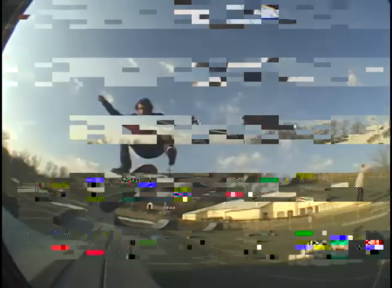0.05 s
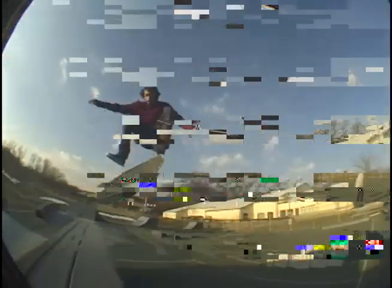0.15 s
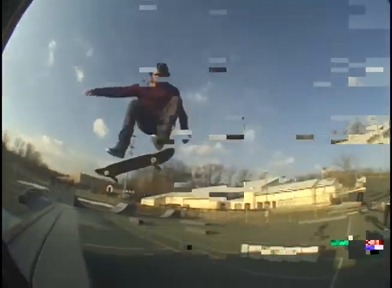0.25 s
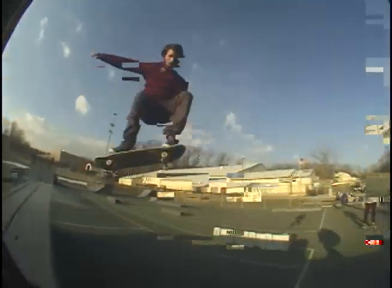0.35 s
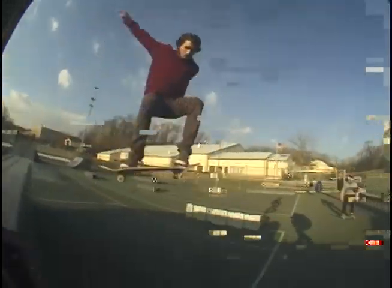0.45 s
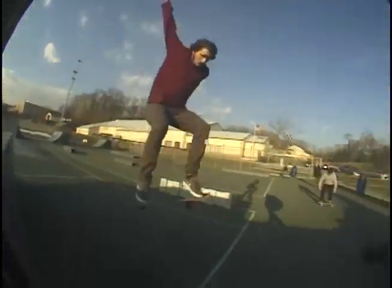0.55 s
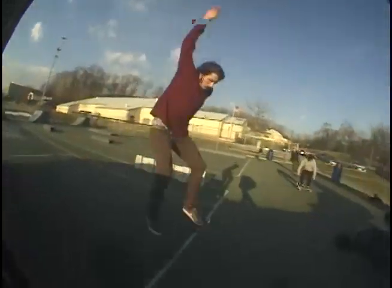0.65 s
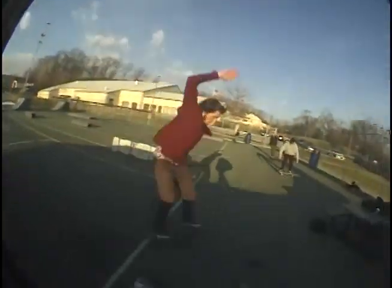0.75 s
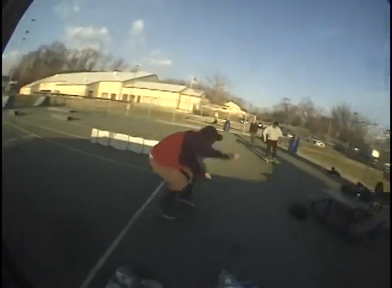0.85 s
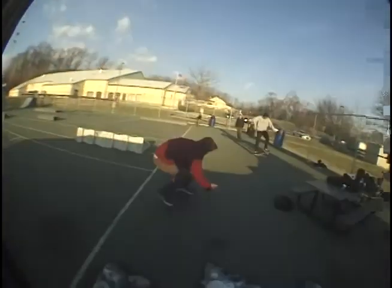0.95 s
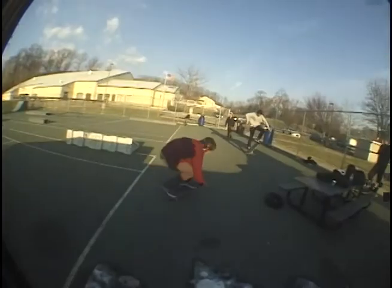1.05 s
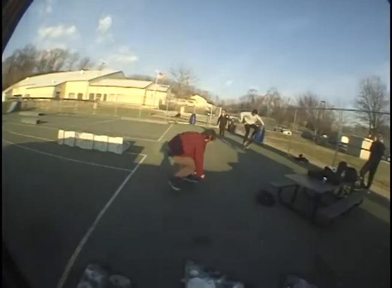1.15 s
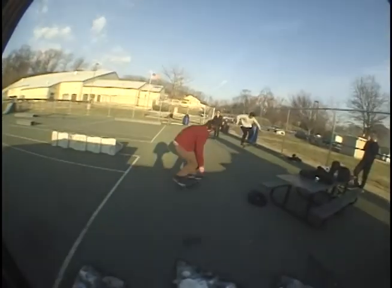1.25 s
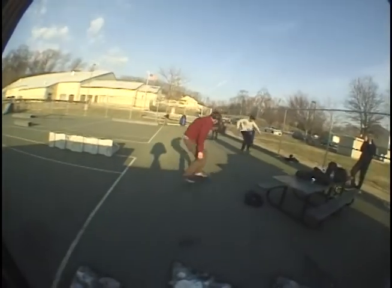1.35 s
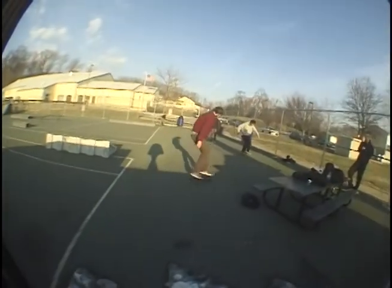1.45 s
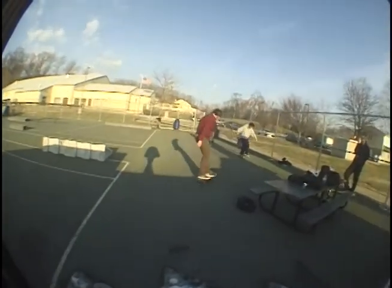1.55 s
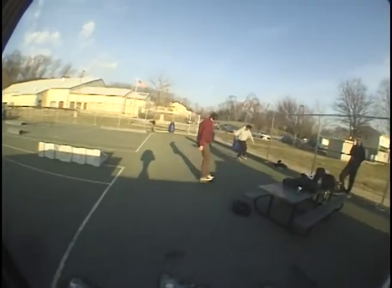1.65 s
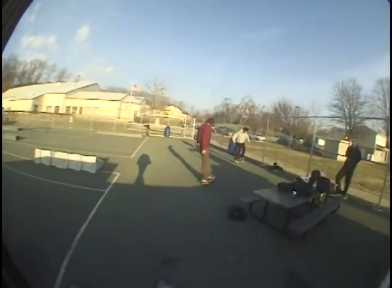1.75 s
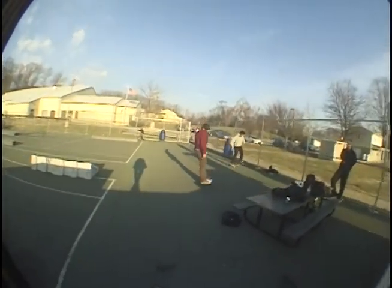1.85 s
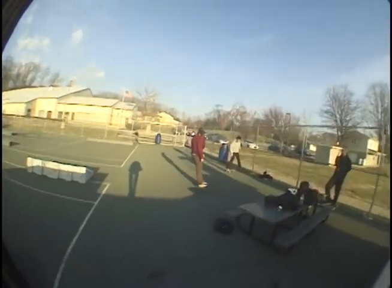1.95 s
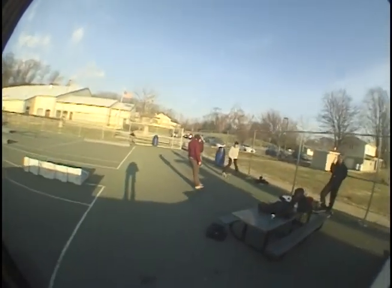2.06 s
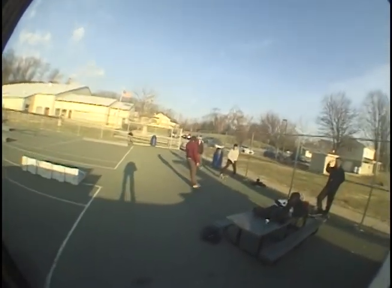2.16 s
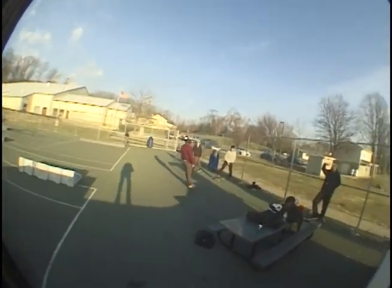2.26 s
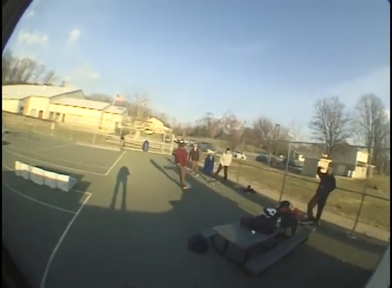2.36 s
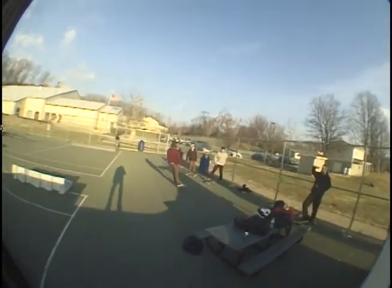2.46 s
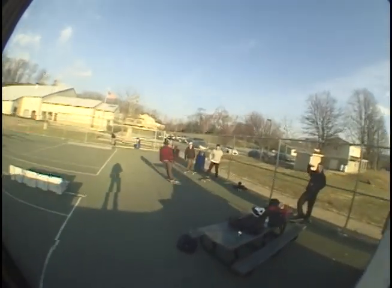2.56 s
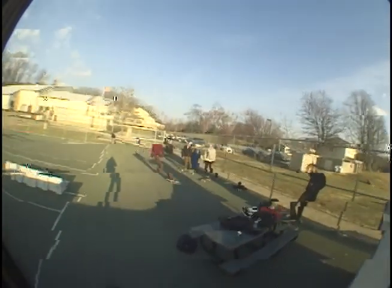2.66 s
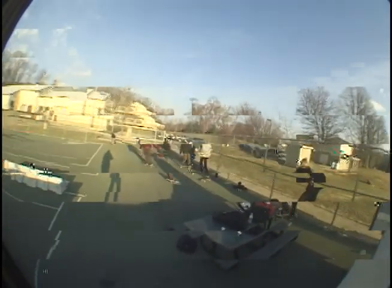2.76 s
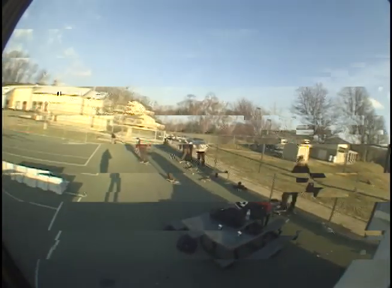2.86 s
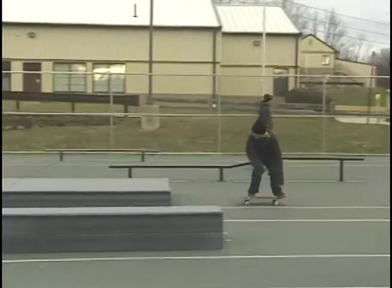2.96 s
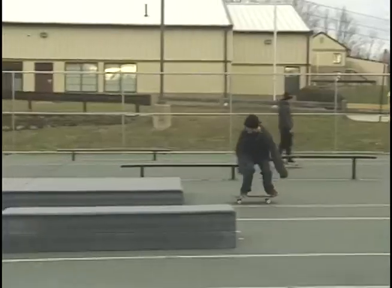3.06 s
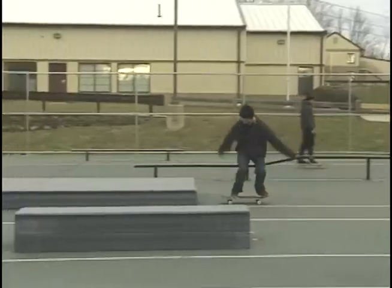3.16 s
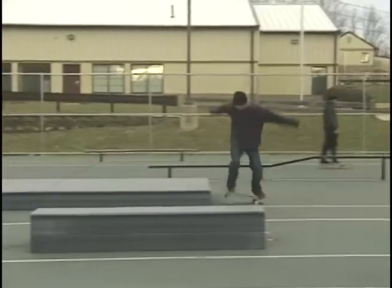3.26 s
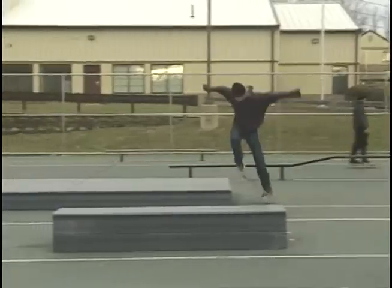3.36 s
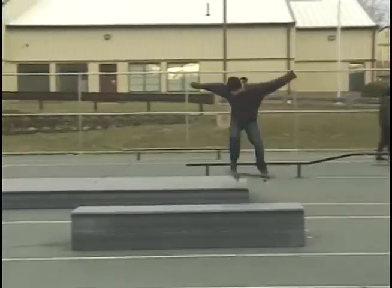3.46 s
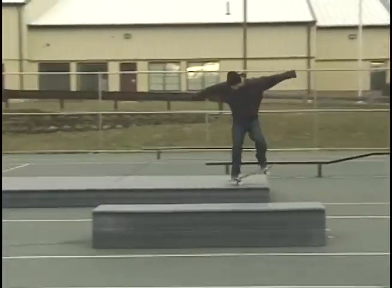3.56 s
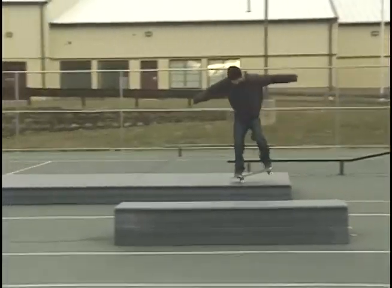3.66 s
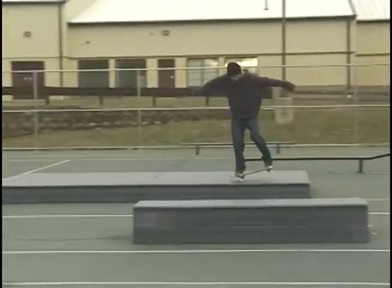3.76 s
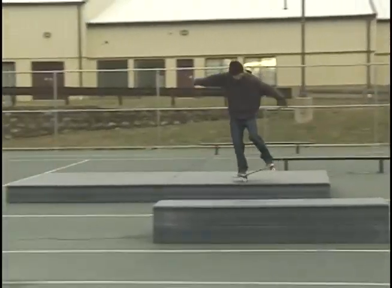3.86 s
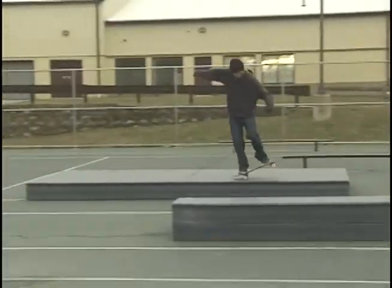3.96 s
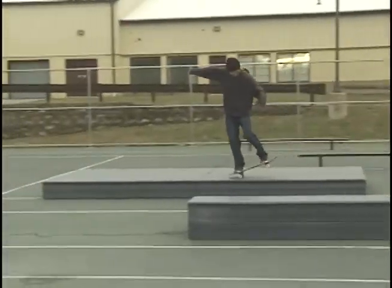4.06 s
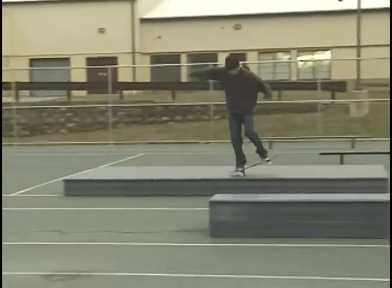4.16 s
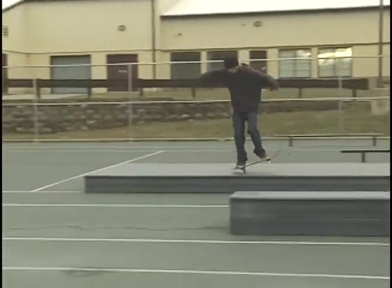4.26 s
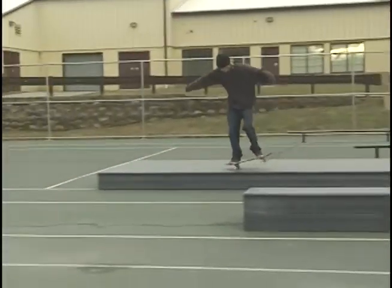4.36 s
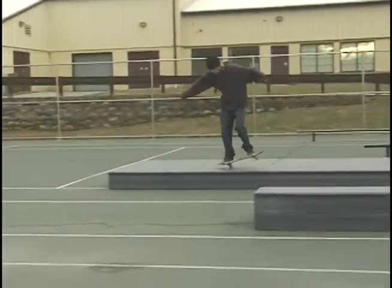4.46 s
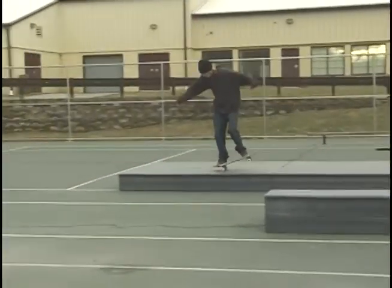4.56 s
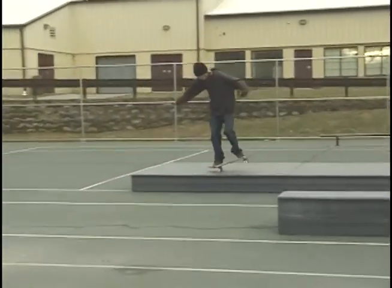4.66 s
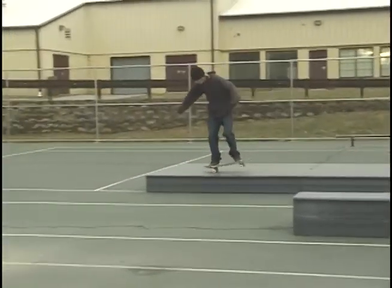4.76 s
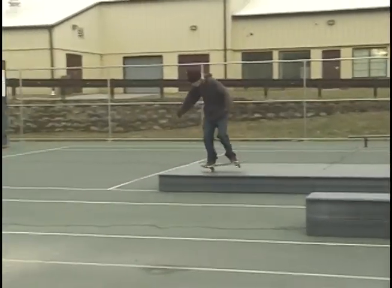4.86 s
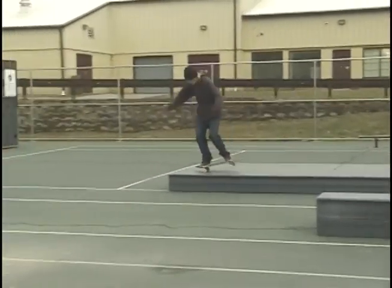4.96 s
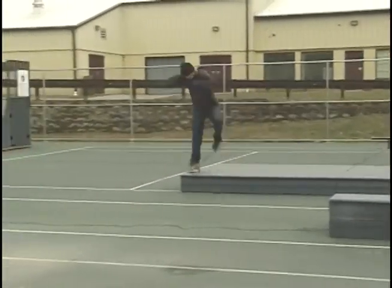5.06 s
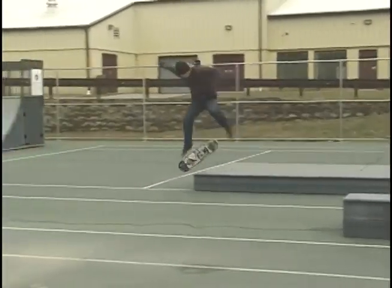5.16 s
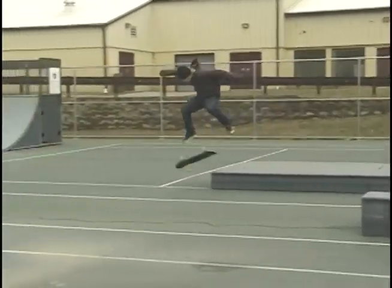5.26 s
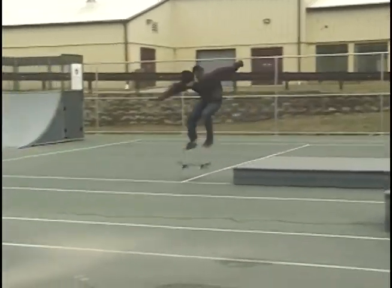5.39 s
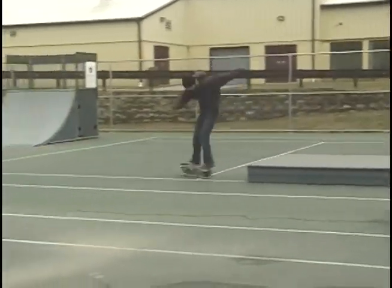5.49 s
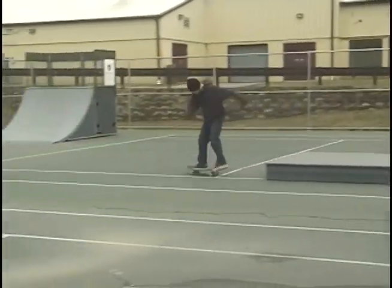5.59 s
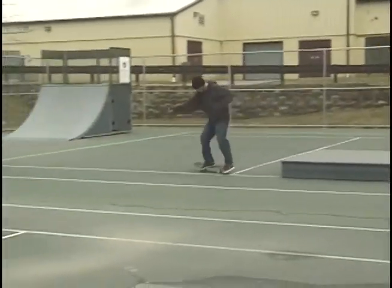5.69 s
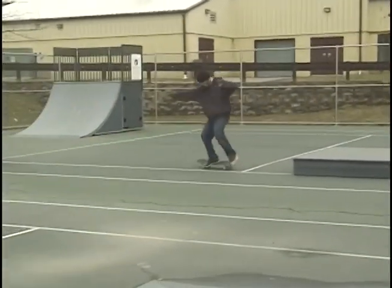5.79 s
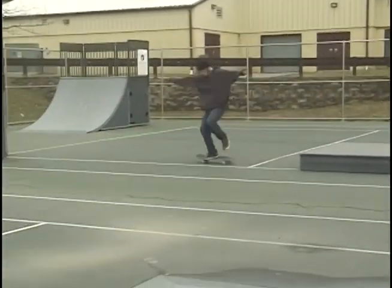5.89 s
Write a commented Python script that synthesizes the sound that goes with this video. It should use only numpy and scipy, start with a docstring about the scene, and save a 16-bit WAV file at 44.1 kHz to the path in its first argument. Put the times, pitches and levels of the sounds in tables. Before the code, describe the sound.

Skateboard wheels roll on rough concrete with sharp clacks of pops and landings, and a hollow rumble along a ledge, in light wind.

```python
"""Skateboards roll, pop, slap and land at an outdoor concrete park; a second rider rolls on the left.
Each contact rings the deck and trucks; boards judder, loose washers tick, a dragged wheel skids.
Rough concrete makes the wheels rumble and hiss; a hollow box booms. Walls answer the hits, wind buffets
the two microphone ports in opposite directions, and a faint high hiss swells and fades.
One landing overloads the input. Near the middle, after a faint dull click, all drops out for 0.3 s."""
import sys
import numpy as np
from scipy import signal
from scipy.fft import rfft, irfft, next_fast_len
from scipy.io import wavfile
from scipy.ndimage import uniform_filter1d, map_coordinates

SR = 44100
rng = np.random.default_rng(int(sys.argv[2]) if len(sys.argv) > 2 else 0)


def generate_wav(signal):
    """Clip the signal to [-1, 1] and save it as 16-bit WAV at the path in sys.argv[1]."""
    frames = np.transpose(np.atleast_2d(signal))
    scaled = np.clip(frames, -1, 1) * 32767
    pcm = np.round(scaled).astype(np.int16)
    wavfile.write(sys.argv[1], SR, pcm)


N = 261422

# Knocks: board contacts, except at 2.628 s, a faint dull click just before the sound drops out.
# Each row: time in seconds, strength in dB, brightness (truck over deck modes) in dB,
# clack over strength in dB, chatter length in ms.
KNOCKS = [(0.309, -25, -7.5, -4.5, 14), (0.3309, -26.5, -2.5, 0.5, 9.1), (0.3491, -32.5, 5, 0.5, 8.3),
          (0.378, -34.5, 2, -3.5, 14), (.452, -38, -9, 1, 19), (.652, -44, -16, -8.5, 10),
          (0.7194, -1, -1.5, 2.5, 19), (.7266, 0, 0.5, -9, 12), (.734, -9.5, -5.5, -7, 12),
          (.768, -34, -13, -3.5, 19), (.843, -33, 0, 4.5, 16), (0.887, -34.5, 2, 1.5, 13),
          (.996, -44, 3, 4, 14), (1.0212, -30, 14.5, 5, 9.9), (1.047, -37.5, -2.5, 3, 12),
          (1.119, -36.5, -2, 0.5, 12), (1.29, -41.5, 2.5, 1, 23), (1.343, -39, 8, 2.5, 25),
          (1.3715, -22.5, 14.5, 5.5, 6.6), (1.376, -18.5, -3.5, 6.5, 16), (1.462, -37, 5, 6, 18),
          (1.548, -37, -3, 2.5, 25), (1.824, -44, 2, 5, 22), (2.628, -44, -25.5, -12, 31),
          (3.048, -36, -4.5, 1, 11), (3.0945, -22, -3, 5, 6.2), (3.116, -37, -3.5, 1, 7),
          (3.126, -26, 2.5, 0.5, 13), (3.146, -34.5, 0, 3, 13), (3.1643, -30, -3.5, 0.5, 20),
          (3.3551, -36.5, 16, 5, 19), (3.393, -46, 9, 6, 13), (3.5167, -29.5, 3, 0.5, 8.6),
          (3.535, -30, -8, 3.5, 11), (3.549, -39.5, -10.5, -0.5, 34), (3.65, -23.5, 2.5, 2.5, 14),
          (3.654, -24, 9.5, 3, 6), (4.045, -39.5, 7.5, 0, 11), (4.082, -35, 12, 4.5, 22),
          (4.135, -27.5, 6, 1.5, 8.6), (4.151, -36.5, 1, -1, 8), (4.18, -38.5, -0.5, -4, 11),
          (4.305, -32, -9, -1.5, 27), (4.331, -43.5, -7, 4.5, 18), (4.674, -34, -4, -9, 6.3),
          (5.12, -37.5, 1, -0.5, 8.8), (5.348, -32.5, 1.5, -1.5, 17), (5.484, -15, -2.5, 2, 8.2),
          (5.4965, -20.5, -7.5, 7, 11), (5.509, -21.5, -13, -7.5, 12), (5.5176, -18.5, 4.5, 4, 6.5),
          (5.549, -34.5, -11, 4, 12), (5.5847, -26, -10, 5.5, 8.5), (5.597, -29.5, -1, 2, 11),
          (5.6072, -18.5, -1, -3, 8.4), (5.616, -16, -1.5, 1.5, 12), (5.632, -25.5, -1, 0, 17),
          (5.699, -37, -6, 5.5, 32)]
# Knock position. Each row: time in seconds, left over right in dB, treble loss in dB (sign ignored).
KNOCK_POSITION = [(.3, 4, -2.5), (.72, 1, 2), (.9, 4, 20), (1.3, 1, 10), (1.8, -0.5, 3), (3.05, -1.5, 1.5),
                  (3.2, -5, 4), (3.5, -1, 3.5), (3.65, 6.5, 7.5), (4.7, 8, 6), (5.35, 0.5, 5), (5.6, 0, 6),
                  (5.63, -1, 2.5)]
# Resonances. Each row: centre in Hz, width in Hz, relative gain in dB.
THUMP_MODES = [(118, 79, -8.5), (220, 63, 1), (312, 140, -3.5)]
DECK_MODES = [(389.5, 210, -10), (525, 94, 2.5), (617, 49, 0), (775, 150, -1.5)]
CLACK_MODES = [(1100, 130, 1.5), (1311, 180, 0.5), (1458, 230, 0.5), (1811, 300, -0.5), (2380, 340, -1.5),
               (2556, 320, -3)]
TRUCK_MODES = [(3490, 520, 0), (4430, 620, -1.5), (5700, 1000, -2), (7000, 1190, -3.5), (8960, 2000, -7),
               (13300, 11000, -20.5)]
WASHER_MODES = [(2920, 580, -1), (5100, 360, 5.5), (6200, 600, -2.5), (7350, 740, -12.5)]
SKID_MODES = [(978, 61, 2), (1453, 86, 2), (1830, 280, -7), (5180, 3000, -22.5)]
# Washer rattles and wheel skids. Each row: start and end in seconds, drive in dB, pulses per second.
RATTLE_SPELLS = [(.805, .83, -37, 100), (.87, .935, -37, 100), (.972, 1.012, -28.5, 89),
                 (1.113, 1.19, -36, 86), (1.285, 1.31, -38, 130), (1.465, 1.49, -33, 106)]
SKID_SPELLS = [(1.705, 1.76, -29, 130), (1.765, 1.795, -33, 130)]
# Shaking after a pop or landing. Each row: start in seconds, level and brightness in dB, T60 in seconds.
BOARD_JUDDERS = [(.31, -33, 7, 0.41), (.745, -31, -0.5, 1.4), (.83, -35, 6, 0.34), (1.39, -36, 3.5, 0.68),
                 (3.1, -28.5, -6, .6), (3.519, -34, -7, 0.41), (4.31, -33.5, -17, 0.78),
                 (5.5, -34, 3.5, 0.59), (5.63, -39.5, -1, 0.68)]
# Rolling, ahead and on the left. Each row: time in seconds, level in dB, brightness in dB.
AHEAD_ROLLING = [(.07, -43.5, 0.5), (.29, -46, 8), (.53, -43, 4), (.62, -53, 6.5), (.7, -39, 1),
                 (1.05, -41.5, 2), (1.3, -41, 3.5), (1.58, -43, 0), (1.8, -38, -1), (2.0, -44.5, -3),
                 (2.2, -42, -1.5), (2.47, -42.5, -2), (2.63, -45, -1.5), (2.94, -42.5, -20.5),
                 (3.07, -41.5, -10), (3.3, -49, -2), (3.5, -53.5, 3.5), (3.6, -43, -4), (3.9, -46, -2),
                 (4.1, -44.5, -5), (4.29, -49, 1), (4.42, -49, -12), (4.7, -45, -9), (5.0, -50, 1.5),
                 (5.2, -48.5, 7), (5.47, -47, 2), (5.74, -40.5, -5), (5.92, -51.5, -6)]
LEFT_ROLLING = [(.07, -51, 9.5), (.42, -46, -3), (.7, -57, 2), (2.9, -71, 3), (2.94, -43.5, 0),
                (3.07, -49.5, -2.5), (3.5, -62.5, 16.5), (3.7, -42.5, 4), (4.1, -41.5, 0.5),
                (4.23, -48, -5.5), (4.55, -44.5, 2), (4.8, -40.5, 5), (5.0, -46, 3.5), (5.2, -40.5, -3.5),
                (5.4, -36.5, -6), (5.54, -40, -2.5), (5.66, -39.5, -1.5), (5.92, -42, -8)]
# Balance of rumble (ahead only), hum, growl and hiss. Each row: offset in dB, dB per dB of brightness.
AHEAD_BALANCE = [(-6, -0.4), (-0.5, -0.18), (-1.5, 0.24), (-4, 1.02)]
LEFT_BALANCE = [(0, -.6), (0.27, 0.32), (-1.1, 0.3)]
# Tones in the rolling noise. Each row: start and end in seconds, pitch and width in Hz, level in dB,
# left over right in dB.
SINGING_BANDS = [(1.8, 2.643, 386, 70, -46.5, 0), (3.716, 4.102, 2260, 497, -51, 9),
                 (4.022, 4.122, 1290, 120, -40.5, 7), (4.027, 4.11, 5550, 1200, -43, 7),
                 (3.53, 3.611, 213, 40, -34, 1), (5.1, 5.897, 533, 120, -42.5, 8)]
# Envelopes of the hollow box, the wind and the high hiss. Each row: time in seconds, level in dB.
BOX_LEVEL = [(3.5, -73), (3.53, -30.5), (3.62, -38), (3.9, -33.5), (4.1, -38.5), (4.29, -50), (4.33, -46),
             (4.42, -46), (4.7, -45.5), (5.2, -47.5), (5.4, -56)]
WIND_LEVEL = [(.08, -42), (.34, -33.5), (.48, -40), (.61, -32), (.75, -43), (1.02, -51), (1.15, -32),
              (1.69, -41.5), (1.82, -32.5), (1.96, -42), (2.09, -32.5), (2.23, -37.5), (2.5, -33.5),
              (2.63, -50), (2.94, -51.5), (3.41, -44.5), (3.57, -38), (3.73, -45), (3.88, -33.5),
              (4.04, -38), (4.35, -38), (4.98, -44.5), (5.45, -39), (5.76, -42), (5.92, -48)]
HIGH_HISS_LEVEL = [(.08, -56), (.34, -44.5), (.48, -49), (.75, -52.5), (1.05, -67), (1.42, -52.5),
                   (1.96, -74), (2.09, -57), (2.63, -55.5), (2.94, -68), (3.41, -81), (4.04, -57),
                   (4.35, -66), (4.82, -59.5), (5.14, -65.5), (5.55, -62), (5.92, -72.5)]
# Noise spectra. Each row: frequency in Hz, relative density in dB.
GROUND_SPECTRUM = [(60, -10.5), (110, -5), (215, -3), (300, -3.5), (420, -31)]
BOX_SPECTRUM = [(35, -21), (70, -10), (120, -3), (215, -3), (320, -7), (450, -27)]
DECK_SPECTRUM = [(220, -32), (320, -6.5), (400, -1.5), (520, -0.5), (650, -3), (900, -5), (1200, -28)]
TREAD_SPECTRUM = [(600, -13.5), (900, -1.5), (1250, 3), (1700, -1), (2100, -5), (2800, -29.5),
                  (4000, -28.5)]
BEARING_SPECTRUM = [(1500, -13), (2500, 1.5), (3800, -3), (5100, -2), (6300, -6.5), (8000, -9),
                    (10300, -13), (11500, -24), (16000, -37)]
LEFT_DECK_SPECTRUM = [(220, -14.5), (370, -6.5), (460, -1.5), (570, -4.5), (660, -6.5), (1000, -31)]
LEFT_TREAD_SPECTRUM = [(600, -18), (850, -3.5), (1150, 0.5), (1600, -4.5), (2300, -5.5), (2700, -8),
                       (4000, -25)]
LEFT_BEARING_SPECTRUM = [(2000, -21.5), (3000, -1.5), (4100, -1), (5600, 2), (6500, -4), (7300, -10),
                         (8900, -11), (10300, -11), (11300, -22.5), (16000, -34.5)]
WIND_SPECTRUM = [(15, -29), (30, -10), (60, -5), (100, -7.5), (150, -15.5), (300, -41.5), (600, -58.5)]
HIGH_HISS_SPECTRUM = [(5000, -17), (9000, 1), (12000, 2.5), (16000, -1)]
# Decay of the wall reflections. Each row: frequency in Hz, T60 in seconds.
WALL_DECAY = [(150, 0.1), (1000, 0.17), (4000, 0.15), (12000, 0.052)]
# Stretches with sound. Each row: start and end in seconds.
AUDIBLE_SPANS = [(.0679, 2.637), (2.9384, 5.9265)]


def knocks(lead_samples_per_db=.8, dull_hz=10000):
    """Board contacts and one dull click: a hard jolt and fading chatter ring four resonance groups."""
    groups = (THUMP_MODES, DECK_MODES, CLACK_MODES, TRUCK_MODES)
    port_spread = np.array([.05, .08, .25, .3])[:, None]  # the ports differ more in higher groups
    fall_db = np.array([11, 13.1, 13, 16.2])[:, None]  # over one chatter length
    t = np.arange(SR // 10) / SR
    jolts = np.zeros((4, 2, N + len(t)))
    side_db, loss_db = curves(KNOCK_POSITION)
    for time_s, db, bright_db, clack_db, chatter_ms in KNOCKS:
        pan_db = side_db[round(time_s * SR)]
        deck_db, truck_db = db - bright_db / 2, db + bright_db / 2
        on_box = 3.5 < time_s < 4.4  # the hollow box thumps harder
        thump_db = -13.5 + 0.7 * deck_db + 6.5 * on_box
        levels_db = np.array([thump_db, deck_db, db + clack_db, truck_db])[:, None]
        envelope = amp(levels_db - fall_db * (1000 * t / chatter_ms) ** 1.55)
        uneven_db = 2.1 * np.repeat(rng.standard_normal(len(t) // 30), 30)  # 0.7 ms steps
        common, opposed = rng.standard_normal((2, len(t))) * amp(uneven_db)
        common[0] = 9.1  # first jolt
        for port, side in enumerate((1, -1)):
            start = round(time_s * SR - side * lead_samples_per_db * pan_db / 2)
            chatter = common + side * port_spread * opposed
            jolts[:, port, start:start + len(t)] += envelope * amp(side * pan_db / 2) * chatter
    near = sum(ringing(drive[:, :N], modes) for drive, modes in zip(jolts, groups))
    treble = filtered(near, lambda hz: 1 / (1 + (dull_hz / (hz + 1)) ** 6))
    return near - treble * (1 - amp(-abs(loss_db)))  # distance takes the treble


def stutter(spells, modes, puff_t60_s, jitter_periods):
    """A ticking washer or slipping wheel: short noise puffs at an uneven rate ring its resonances."""
    kicks = np.zeros(N)
    for start_s, end_s, db, rate_hz in spells:
        offset, size = rng.standard_normal((2, 40))
        times_s = start_s + (np.arange(40) + jitter_periods * offset) / rate_hz
        inside = times_s < end_s
        kicks[(times_s[inside] * SR).astype(int)] = amp(db + 3.6 * size[inside])
    t = np.arange(SR // 50) / SR
    envelope = signal.fftconvolve(kicks, amp(-60 * t / puff_t60_s))[:N]
    return ringing(envelope * rng.standard_normal(N), modes)


def wheels_ahead():
    """Hard wheels on rough concrete shake the ground, hollow box, deck, treads and bearings."""
    rolling_db = part_levels_db(*curves(AHEAD_ROLLING), AHEAD_BALANCE)
    ground, deck, tread, bearing = np.sqrt(amp(rolling_db) ** 2 + judder_power())
    bumps = amp(.9 * wobble(40))  # cracks and pebbles jolt every part at once
    rumble = ground * placed(noise_pair(GROUND_SPECTRUM), diffuse=.08)
    boom = amp(*curves(BOX_LEVEL)) * placed(noise_pair(BOX_SPECTRUM), diffuse=.08)
    hum = deck * placed(noise_pair(DECK_SPECTRUM), diffuse=.062)
    growl = tread * placed(noise_pair(TREAD_SPECTRUM), diffuse=.13)
    hiss = bearing * placed(noise_pair(BEARING_SPECTRUM), diffuse=.22)
    return bumps * (rumble + boom + hum + growl + hiss)


def judder_power(rise_s=.004):
    """Power in each part as the board shakes on after a hit: quick rise, exponential fall."""
    t = np.arange(N) / SR
    power = np.zeros((len(AHEAD_BALANCE), N))
    for start_s, db, bright_db, t60_s in BOARD_JUDDERS:
        age_s = np.maximum(t - start_s, 0)
        envelope = (1 - np.exp(-age_s / rise_s)) * amp(-60 * age_s / t60_s)
        gains = amp(part_levels_db(db, bright_db, AHEAD_BALANCE))[:, None]
        power += (gains * envelope) ** 2
    return power


def wheels_left():
    """Deck, treads and bearings of a second board, louder and earlier at the left port."""
    deck, tread, bearing = amp(part_levels_db(*curves(LEFT_ROLLING), LEFT_BALANCE))
    bumps = amp(.8 * wobble(40))
    hum = deck * placed(noise_pair(LEFT_DECK_SPECTRUM), diffuse=.1, pan_db=9, lead_samples=6)
    growl = tread * placed(noise_pair(LEFT_TREAD_SPECTRUM), diffuse=.36, pan_db=7.5, lead_samples=6)
    hiss = bearing * placed(noise_pair(LEFT_BEARING_SPECTRUM), diffuse=.18, pan_db=8, lead_samples=6)
    return bumps * (hum + growl + hiss)


def wheel_singing(fade_s=.026):
    """Rolling noise held in narrow resonances, each fading in and out."""
    t = np.arange(N) / SR
    noise = rng.standard_normal((2, N))
    tones = np.zeros((2, N))
    for start_s, end_s, pitch_hz, width_hz, db, pan_db in SINGING_BANDS:
        band = unit_rms(filtered(noise, lambda hz: 1 / (1 + (2 * (hz - pitch_hz) / width_hz) ** 2)))
        fade = np.clip(np.minimum(t - start_s, end_s - t) / fade_s, 0, 1)
        tones += amp(db + 2.4 * wobble(14)) * fade * placed(band, diffuse=.047, pan_db=pan_db)
    return tones


def wall_reflections(hits, delay_samples=400):
    """Ramps and buildings answer, mostly from ahead; each frequency dies at its own rate."""
    hz, t, noise = signal.stft(rng.standard_normal((2, SR // 2)), SR, nperseg=256)
    t60_s = np.interp(hz, *np.transpose(WALL_DECAY))[:, None]
    ahead, across = signal.istft(noise * amp(-60 * t / t60_s), SR, nperseg=256)[1]
    tail = (ahead + .36 * antiphase(across)) / np.linalg.norm(ahead)
    delayed = np.pad(hits.mean(axis=0), (delay_samples, 0))
    return signal.fftconvolve(delayed[None], tail, axes=1)[:, :N]


def wind():
    """Wind pushes the two ports in opposite directions, in lumps."""
    push, common = noise_pair(WIND_SPECTRUM) * amp(.72 * wobble(51))
    return amp(*curves(WIND_LEVEL)) * (antiphase(unit_rms(push)) + .42 * unit_rms(common))


def high_hiss():
    """A faint high hiss that swells and fades."""
    mid, side = noise_pair(HIGH_HISS_SPECTRUM)
    return amp(*curves(HIGH_HISS_LEVEL)) * (mid + .55 * antiphase(side))


def amp(db):
    return 10 ** (np.asarray(db) / 20)


def unit_rms(x):
    return x / np.sqrt(np.mean(x ** 2) + 1e-20)


def antiphase(x):
    return x * [[1], [-1]]


def part_levels_db(level_db, bright_db, balance):
    return [level_db + offset_db + slope * bright_db for offset_db, slope in balance]


def curves(rows):
    """One value per sample for each column after the time."""
    times_s, *columns = np.transpose(rows)
    return [np.interp(np.arange(N) / SR, times_s, column) for column in columns]


def wobble(rate_hz):
    """Smooth random curve through rate_hz knots a second."""
    knots = rng.standard_normal(int(N * rate_hz / SR) + 4)
    return map_coordinates(knots, [np.arange(N) * rate_hz / SR])


def filtered(x, response):
    """Apply a complex frequency response."""
    size = next_fast_len(N + SR // 2)
    return irfft(rfft(x, size) * response(np.fft.rfftfreq(size, 1 / SR)), size)[..., :N]


def ringing(x, modes):
    """Causal resonances of alternating sign, with a mean power gain of 1."""
    def response(hz):
        gain = sum((-1) ** k * amp(db) * 1j * hz * width / (centre ** 2 - hz ** 2 + 1j * hz * width)
                   for k, (centre, width, db) in enumerate(modes))
        return gain / np.sqrt(np.mean(abs(gain) ** 2))
    return filtered(x, response)


def noise_pair(spectrum, patch_db=1.3, grit_db=1.5):
    """Two unrelated shaped noises of rms 1, with patches of random gain and a fine grit."""
    def response(hz):
        knot_hz, db = np.transpose(spectrum)
        return amp(np.interp(np.log(hz + 1), np.log(knot_hz + 1), db, left=2 * db[0], right=2 * db[-1]))
    cells = signal.stft(rng.standard_normal((2, N)), nperseg=512)[2]
    patches = uniform_filter1d(rng.standard_normal(cells.shape[1:]), size=6, axis=0)
    patches = unit_rms(uniform_filter1d(patches, size=8, axis=1))
    patchy = signal.istft(cells * amp(patch_db * patches), nperseg=512)[1][:, :N]
    gritty = patchy * amp(grit_db * wobble(300))
    return unit_rms(filtered(gritty, response))


def placed(pair, diffuse, pan_db=0, lead_samples=0):
    """First noise direct, second scattered with power share diffuse; pan and lead favour the left."""
    direct = np.array([pair[0], np.roll(pair[0], lead_samples)])
    mix = np.sqrt(1 - diffuse) * direct + np.sqrt(diffuse) * antiphase(pair[1])
    return mix * amp([[pan_db / 2], [-pan_db / 2]])


def scene():
    """Hits and their reflections over rolling, wind and a faint high hiss."""
    hits = knocks()
    hits += stutter(RATTLE_SPELLS, WASHER_MODES, puff_t60_s=.018, jitter_periods=.15)
    hits += stutter(SKID_SPELLS, SKID_MODES, puff_t60_s=.047, jitter_periods=.22)
    reflections = amp(-25) * wall_reflections(hits)
    return hits + reflections + wheels_ahead() + wheels_left() + wheel_singing() + wind() + high_hiss()


def record(dry):
    """Soft clipping near full scale, silence outside the audible spans, then a band limit."""
    ceiling, top_hz = .95, 15750
    clipped = dry / (1 + abs(dry / ceiling) ** 10) ** (1 / 10)
    t = np.arange(N) / SR
    gate = sum((t > start_s) & (t < end_s) for start_s, end_s in AUDIBLE_SPANS)
    return filtered(clipped * gate, lambda hz: hz < top_hz)


dry = scene()
out = record(dry)
generate_wav(out)
```